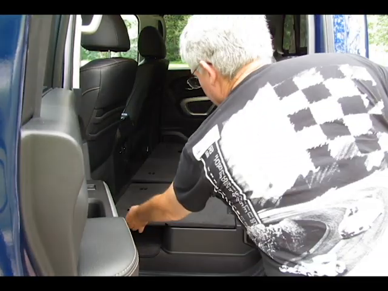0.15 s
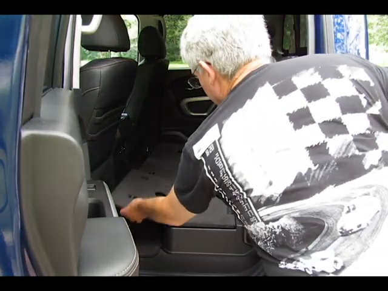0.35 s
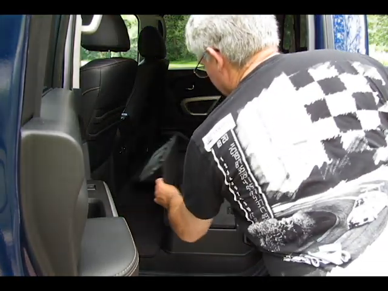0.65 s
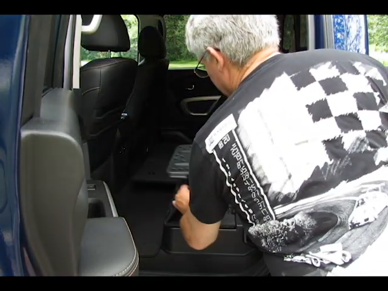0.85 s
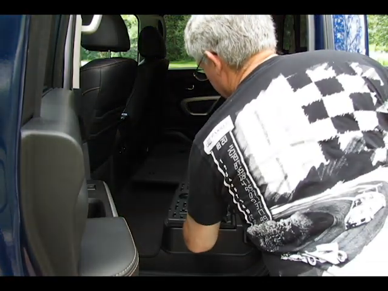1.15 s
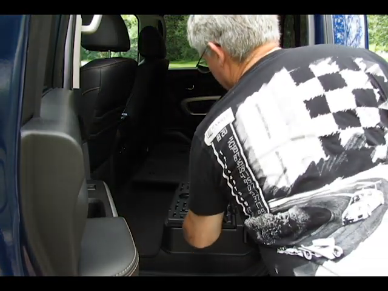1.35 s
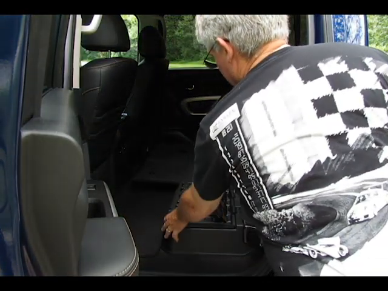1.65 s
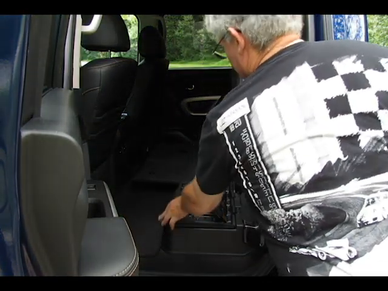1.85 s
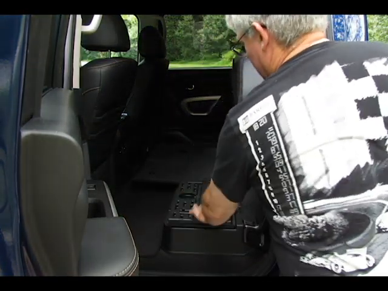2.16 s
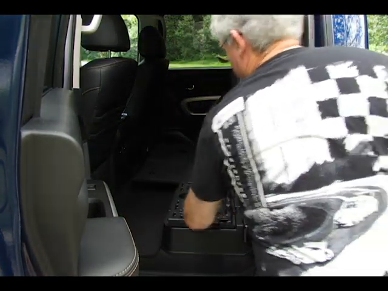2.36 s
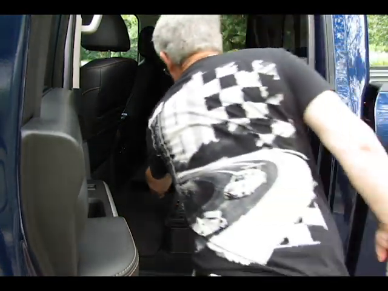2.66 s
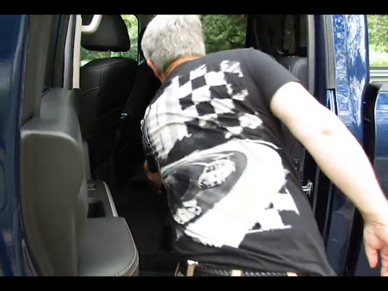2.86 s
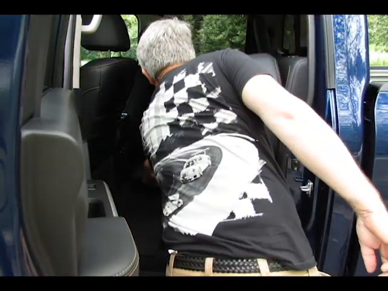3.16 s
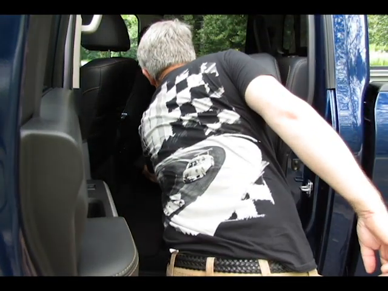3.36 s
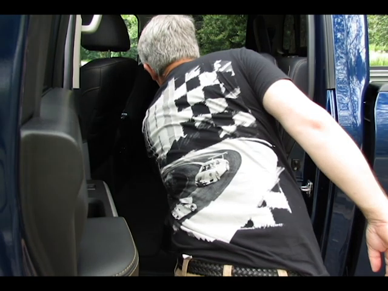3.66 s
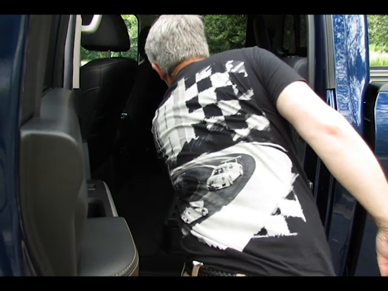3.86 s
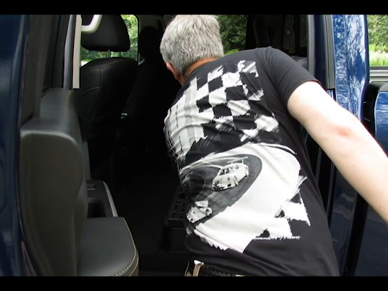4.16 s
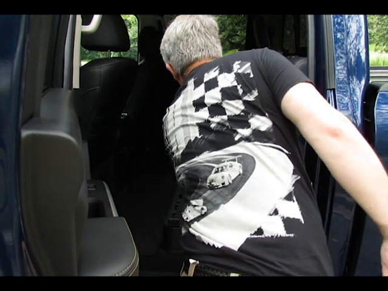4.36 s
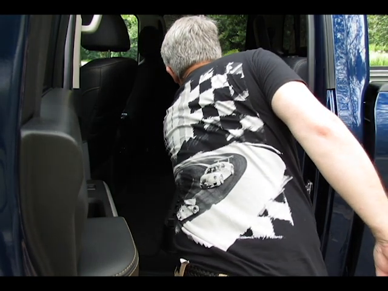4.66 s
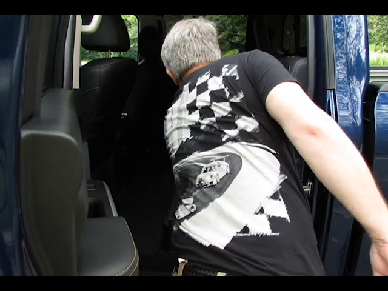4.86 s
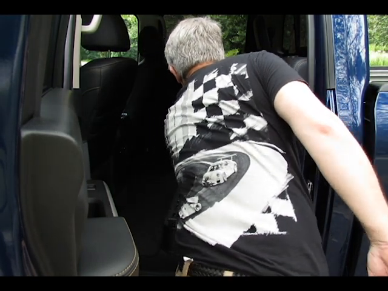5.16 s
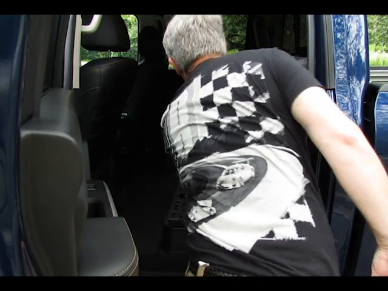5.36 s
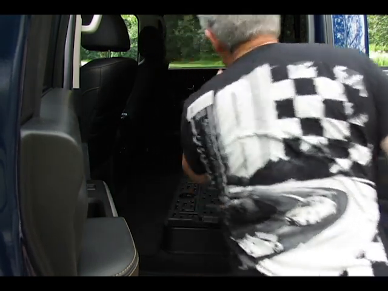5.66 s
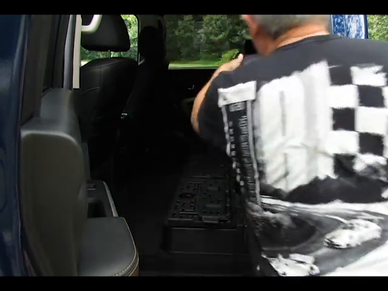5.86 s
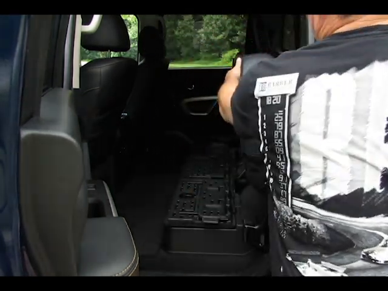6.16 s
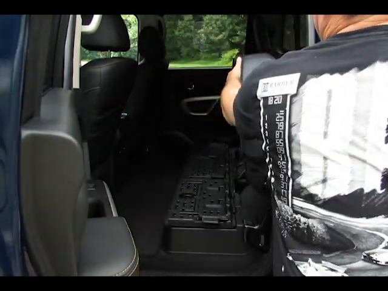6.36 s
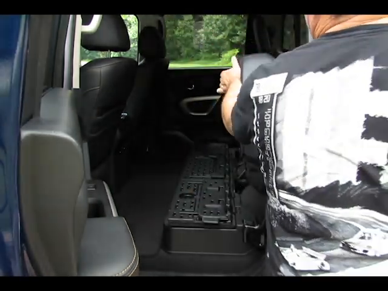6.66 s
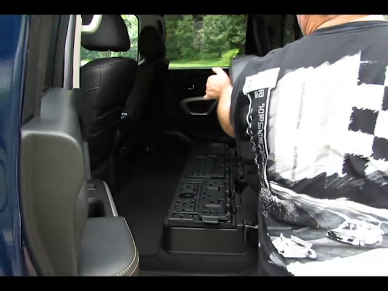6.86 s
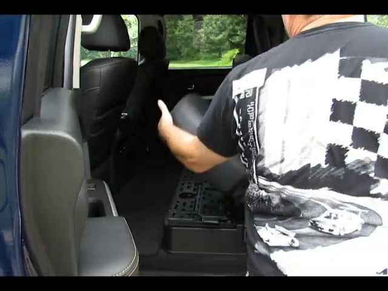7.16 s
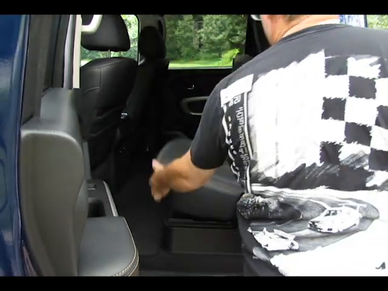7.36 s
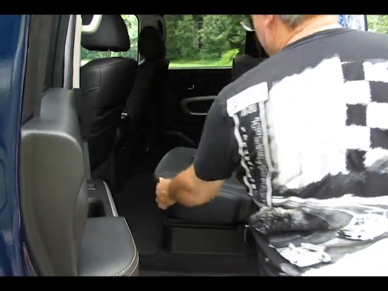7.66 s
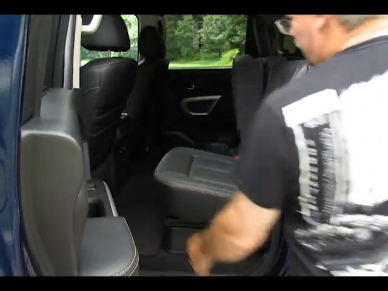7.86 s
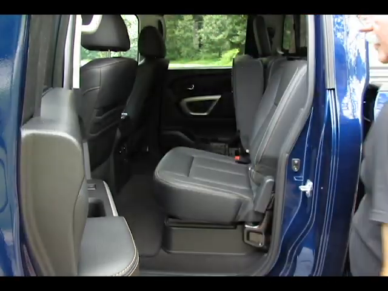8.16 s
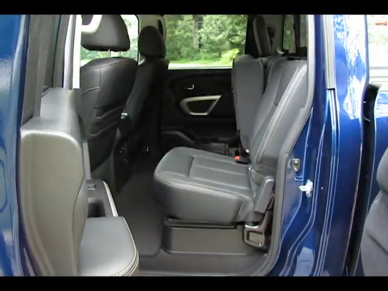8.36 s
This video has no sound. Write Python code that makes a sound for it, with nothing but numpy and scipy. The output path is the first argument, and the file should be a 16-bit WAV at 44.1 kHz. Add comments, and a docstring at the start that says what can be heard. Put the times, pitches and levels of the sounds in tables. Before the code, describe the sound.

Close inside a padded truck cab with the door open, low road rumble and faint insect buzzing. A full plastic thump comes at one second, then small clicks and a duller knock near four. At five a hard clack; at six loud creaky leather snaps with a rub. Then metallic latch clacks tumble together as the seat drops, ending in light creaks and a hand rub.

```python
"""Storage platforms are folded away under the rear seat of a parked truck; the seat is unlatched and dropped.
Plastic panels knock and scrape and the steel latch clacks: rough contacts ring fading tones and a short cab tail.
Leather creaks in small clicks; a sliding panel, a creak and a hand on the seat rub as crowds of tiny slips.
Through the open door come road noise and insects made of coloured noise, and idling engines made of sines.
A gain control turns everything down after hard blows."""
import sys
import numpy as np
from scipy import signal
from scipy.fft import rfft, irfft, next_fast_len
from scipy.io import wavfile
from scipy.ndimage import uniform_filter1d

SR = 44100
rng = np.random.default_rng(int(sys.argv[2]) if len(sys.argv) > 2 else 0)


def generate_wav(signal):
    """Clip the signal to [-1, 1] and save it as 16-bit WAV at the path in sys.argv[1]."""
    frames = np.transpose(np.atleast_2d(signal))
    scaled = np.clip(frames, -1, 1) * 32767
    pcm = np.round(scaled).astype(np.int16)
    wavfile.write(sys.argv[1], SR, pcm)


N = 374618
T = np.arange(N) / SR
HZ = np.fft.rfftfreq(N, 1 / SR)
EDGE_HZ = 15900  # upper edge of the whole sound

# Loudness of the distant road. Each row: time in seconds, change of level in dB.
ROAD = [(0, 4), (.95, 4.5), (1.6, 0.6), (3.5, 0.65), (5.8, -2), (8.49, -0.54)]
# Colour of the outdoor air heard through the cab. Each row: frequency in Hz, relative level in dB.
AIR_COLOUR = [(25, -10.5), (70, 0), (130, 0), (290, -1.5), (400, -8.5), (550, -14), (850, -6.5),
              (1500, -15), (2200, -21.5), (3700, -30.5), (6000, -34.5), (8700, -45.5), (11500, -47.5),
              (15500, -51)]
# The cab rumble grows slowly.
RUMBLE_DB, RUMBLE_DB_PER_S = -3, 0.5

# One engine settles from a fast to a slow idle and fades.
FAST_IDLE_HZ, SLOW_IDLE_HZ, SETTLE_AT_S, SETTLE_S = 71.5, 58.7, 2.28, 0.206
IDLE_DB, IDLE_FADE_DB_PER_S = -40, 1
# Another engine ends slower and louder than it began.
# Each row: time in seconds, engine cycle in Hz, level in dB before the offsets in DRONE.
FAR_IDLE = [(0, 19.5, -48), (3.1, 21.2, -43.5), (4.4, 19.4, -46), (5.9, 18.9, -37), (7.2, 18.42, -36),
            (8.49, 18.1, -38)]
# It drones on odd multiples of its cycle.
# Each row: multiple of the cycle, level offset in dB, extra dB for each dB above DRONE_FULL_DB.
DRONE = [(5, -0.5, 0), (7, -5.5, 1.5), (9, -1, 1.3)]
DRONE_FULL_DB = -36

# Buzzes of an insect in the trees. Each row: start in seconds, level in dB before it swells and flutters.
BUZZES = [(-.4, -58), (.61, -55.5), (1.93, -56), (3.125, -54.5), (4.19, -57), (5.27, -58.5), (6.4, -58.5),
          (7.937, -56)]
BUZZ_S = 0.91  # length of each buzz
# Colours of the buzz and of the chorus. Each row: frequency in Hz, relative level in dB.
BUZZ_COLOUR = [(100, -70), (5000, -24), (6300, -8), (7100, -5.5), (7900, -5), (8400, -22), (10000, -51)]
CHORUS_COLOUR = [(100, -70), (8000, -7), (9200, -3), (9700, 2), (10150, -2), (10700, -16), (14000, -42)]

# Rubs and scrapes: a panel sliding, a creak, a hand on the seat.
# Each row: start in seconds, length in seconds, level in dB before it wavers.
RUBS = [(1.835, .115, -50.5), (4.995, 0.21, -47), (6.028, 0.12, -32.5), (6.732, .11, -44),
        (8.138, 0.17, -32)]
# Colour of the rubbing. Each row: frequency in Hz, relative level in dB.
RUB_COLOUR = [(150, -30), (600, -1), (1200, 2.5), (2000, -2), (3200, 2), (4300, -8.5), (6000, -3.5),
              (9000, -13.5), (12000, -19.5), (16000, -23)]
RUB_ATTACK_S, RUB_RELEASE_S = 0.041, 0.056

# Snaps of leather and trim. Each row: time in seconds, peak level in dB, brightness in dB an octave.
SNAPS = [(5.154, -17, 0.5), (5.226, -20.5, -7), (5.979, -16, -5.5), (6.028, -11, -6), (6.0335, -10.5, 0.5),
         (6.0384, -4, -1), (6.0566, -5, 0), (7.9206, -17.5, 4.5), (7.977, -20.5, -3.5), (7.999, -23, -6),
         (8.034, -20, 0.5), (8.046, -17, 0)]
# Colour of the snaps. Each row: frequency in Hz, relative level in dB.
SNAP_COLOUR = [(100, -36), (600, -11), (1050, -5), (1350, -8), (1650, 4), (2100, 4), (2450, -0.5),
               (2900, -4), (3350, -7), (4300, -12), (5700, -7.5), (7500, -20), (10000, -34), (16000, -26.5)]
# The gripped cushion creaks on in a dying run of small snaps; brightness is in dB an octave.
CREAK_AT_S, CREAK_GAP_S, CREAK_DB, CREAK_FADE_DB_PER_S, CREAK_BRIGHT_DB = 6.063, 0.011, -17, 60, 1.2

# Blows and a short scrape of the plastic platforms.
# Each row: time in seconds, length of the contact's chatter in seconds,
# time in seconds for the cab tail to fade by 60 dB, pitch region favoured by the struck spot in Hz,
# strength in dB, weight of the bass in dB, brightness in dB an octave.
PLATFORM_CONTACTS = [(1.0543, 0.0039, 0.082, 297, -15, 11, -5.4),
                     (1.065, 0.0047, 0.042, 1800, -30, 12, 1.3), (1.884, 0.0036, .087, 2270, -39, -27, -4),
                     (2.2195, 0.007, 0.035, 2350, -33.5, -10, -8.5),
                     (2.2235, 0.0036, .02, 824, -28.5, 0, -4.5),
                     (2.2325, .0025, 0.092, 175, -36.5, 11.5, -4.5),
                     (3.245, 0.0077, .081, 298, -40, -7, -7), (3.761, 0.0033, .05, 685, -43.5, 6, -9),
                     (3.9285, 0.012, 0.022, 670, -24.5, 5.5, -1.1),
                     (3.941, 0.015, 0.21, 70, -27.5, 14.5, -3.5), (4.046, .008, .11, 635, -41.5, 4, -4.5),
                     (4.966, .01, .061, 2430, -39, 3, -1), (5.019, 0.02, 0.14, 220, -40.5, 13, -9),
                     (5.049, 0.021, 0.12, 720, -41, 19.5, -6), (5.077, .0054, 0.039, 2790, -31.5, 3, 1),
                     (5.0805, 0.0041, 0.064, 627, -11, -3.5, -3.5)]
# Blows of the seat latch and frame. The columns are those of the platform contacts.
SEAT_BLOWS = [(6.392, .012, .094, 2390, -39.5, -11, -1), (6.41, 0.0043, 0.094, 2480, -24, -3.5, -4.5),
              (6.7185, 0.0032, 0.079, 1250, -17, -10.5, -5), (7.118, .016, 0.28, 2610, -28.5, -10, 1.5),
              (7.133, 0.01, 0.11, 1280, -25.5, -13.5, -2.5), (7.1415, .009, 0.054, 2580, -17.5, -19, 0.15),
              (7.167, 0.026, .075, 1940, -32, -14, 0), (7.415, 0.0068, 0.055, 240, -30, 3.5, -3.6),
              (7.424, 0.0018, .17, 70, -25, 1.5, -3.2), (7.4545, 0.012, 0.21, 2220, -25, 3.5, -1),
              (7.522, 0.014, .1, 244, -40, 12, -3), (7.542, 0.024, 0.36, 70, -42.5, 13.5, -4),
              (7.613, 0.022, .6, 325, -42, 4, -5.3)]
# Ringing tones (modes) of the platforms and of the seat, before each contact varies them.
# Each row: frequency in Hz, relative level in dB, time in seconds to fade by 60 dB.
PLATFORM_MODES = [(56.9, -24, 1), (90, -12.5, 0.13), (199.3, -2, 0.13), (230, 4.5, 0.053),
                  (307.5, -1, 0.052), (381, -4, 0.1), (515, -12.5, 0.076), (626, -7.5, 0.079),
                  (920, 4.5, 0.022), (1130, -48, 0.11), (1250, -9, 0.035), (1700, 9, 0.02),
                  (1760, -2, 0.062), (2270, -7, 0.03), (2680, -5, 0.068), (2870, 11, 0.051),
                  (3970, 6, 0.036), (5590, 19, 0.017), (6640, 4, .02), (9600, -21, .03)]
SEAT_MODES = [(33.7, 1, 0.33), (45, -18, 0.25), (67, 11, 0.17), (149, 2, 0.16), (238, 1.5, 0.15),
              (292, -6, 0.19), (368, -3.5, 0.12), (527, -20, .07), (830, -10, 0.077), (1140, -24, 0.063),
              (1444, -8, 0.17), (1680, -22, 0.056), (2050, -23, 0.072), (2170, -7, 0.025),
              (2440, -8, 0.063), (2640, -6, 0.064), (3320, -1, 0.064), (4170, -28, 0.096), (5905, 7, 0.095),
              (6600, 4, 0.094), (9750, 6, 0.1)]
# Plastic and padding shape every contact. Each row: frequency in Hz, relative level in dB.
SOFTNESS = [(20, -15), (35, 0.5), (95, 0), (135, -1.5), (190, -5), (7000, 9), (10500, -4), (13000, -11),
            (16000, -14)]
# Centres of the six ranges of a contact in Hz: thud, boom, knock, clack, tick, fizz.
RANGES_HZ = [60, 230, 700, 2000, 5200, 11500]
# How much of a contact's weight each of the six ranges takes, from 0 to 1.
WEIGHT_SHARE = [1, 1, 0.25, 0.0054, 0.02, 0.013]
# Balance of a plain contact over the six ranges, in dB.
PLATFORM_BALANCE = [-11, 0, -0.5, 0, -1, 1.5]
SEAT_BALANCE = [0.5, 0.5, -2, 0, -.5, 1]
# Brightness tilts the spectrum above this frequency; the struck spot reaches this many octaves.
BRIGHT_FROM_HZ, SPOT_OCTAVES = 1890, 0.95

# Side over mid, outdoors and in the cab. Each row: frequency in Hz, change of the side in dB.
OUTDOOR_WIDTH = [(30, -1), (70, -5.5), (250, -13), (500, -6), (1000, -4), (2000, -1), (4000, 0),
                 (14000, 0.5)]
CAB_WIDTH = [(30, 0), (70, -11), (250, -19), (500, -17), (1000, -16), (2000, -10), (4000, -5), (8000, -8),
             (14000, 0.5)]
# Lean of the whole scene. Each row: frequency in Hz, left over right in dB.
LEAN = [(30, -8), (100, 3.5), (250, 3), (1000, 0), (2000, -2.1), (8000, -0.1), (14000, 1)]


def amp(db):
    """Turns decibels into gain."""
    return 10 ** (np.asarray(db) / 20)


def evened(x):
    """Scales x to an rms of 1."""
    return x / np.sqrt(np.mean(x ** 2) + 1e-20)


def read(points, hz):
    """Reads a spectrum in dB, joined by straight lines on a log-frequency axis."""
    point_hz, db = np.transpose(points)
    return np.interp(np.log(hz + 1), np.log(point_hz + 1), db)


def curves(rows):
    """Draws each column of a timed table sample by sample."""
    s, *columns = np.transpose(rows)
    return [np.interp(T, s, column) for column in columns]


def add(mix, s, sound):
    """Mixes a two-channel sound in at s seconds."""
    part = mix[:, round(s * SR):][:, :sound.shape[1]]
    part += sound[:, :part.shape[1]]


def causal(db):
    """Minimum-phase response of a gain curve: its sound comes at and after the blow, not ahead of it."""
    mirrored = np.concatenate([db, db[-2:0:-1]])
    log_gain = np.log(amp(mirrored))
    return np.exp(np.conj(signal.hilbert(log_gain)))[:len(db)]


def coloured(x, colour):
    """Gives x a spectrum, at an rms of 1."""
    size = next_fast_len(N)
    gain = amp(read(colour, np.fft.rfftfreq(size, 1 / SR)))
    return evened(irfft(rfft(x, size) * gain, size)[..., :N])


def drift(rate):
    """Random wandering of rms 1, with a new random value rate times a second."""
    return evened(np.interp(T * rate, np.arange(4000), rng.standard_normal(4000)))


def outdoors(level_db=-35, waver_db=0.7):
    """Road noise and cab rumble change level separately; the thin hiss above stays level."""
    air = amp(level_db) * coloured(rng.standard_normal((2, N)), AIR_COLOUR)
    low = signal.sosfiltfilt(signal.butter(2, 210, fs=SR, output="sos"), air)
    below_hiss = signal.sosfiltfilt(signal.butter(2, 7000, fs=SR, output="sos"), air)
    road_db = curves(ROAD)[0]
    rumble_db = RUMBLE_DB + RUMBLE_DB_PER_S * T + waver_db * drift(8.1)
    rumble = low * amp(rumble_db)
    road = (below_hiss - low) * amp(road_db)
    hiss = air - below_hiss
    return rumble + road + hiss


def engines(second_db=-8, waver_db=1.33, wobble=0.0034):
    """Two idling engines, heard as a few low harmonics whose pitch and level waver."""
    settled = (1 + np.tanh((T - SETTLE_AT_S) / SETTLE_S)) / 2
    near_hz = FAST_IDLE_HZ + (SLOW_IDLE_HZ - FAST_IDLE_HZ) * settled
    near_db = IDLE_DB - IDLE_FADE_DB_PER_S * T
    near_angle = 2 * np.pi * np.cumsum(near_hz * (1 + wobble * drift(6))) / SR
    far_hz, far_db = curves(FAR_IDLE)
    far_angle = 2 * np.pi * np.cumsum(far_hz * (1 + wobble * drift(6))) / SR
    harmonics = [(near_angle, near_db), (2 * near_angle, near_db + second_db)]
    for multiple, own_db, extra in DRONE:
        level_db = far_db + own_db + extra * (far_db - DRONE_FULL_DB)
        harmonics.append((round(multiple) * far_angle, level_db))
    # the root of two makes each level an rms level
    return np.sqrt(2) * sum(amp(db + waver_db * drift(8.4)) * np.sin(angle) for angle, db in harmonics)


def insects(chorus_db=-63, rise_s=0.025, fade_s=0.64):
    """One insect buzzes about once a second, swelling and fading, over a steady, higher chorus."""
    song = np.zeros(N)
    for s, db in BUZZES:
        rise = np.clip((T - s) / rise_s, 0, 1) ** 0.5
        fade = np.clip((s + BUZZ_S - T) / fade_s, 0, 1)
        song += amp(db) * rise * fade
    flutter = amp(drift(220))
    buzz = song * flutter * coloured(rng.standard_normal((2, N)), BUZZ_COLOUR)
    chorus = amp(chorus_db) * coloured(rng.standard_normal((2, N)), CHORUS_COLOUR)
    return buzz + chorus


def rubs(slips_per_s=450, hiss_db=-20):
    """Crowds of tiny slips between rubbing surfaces, which catch and let go in clumps."""
    slips = (rng.random(N) < slips_per_s / SR) * rng.standard_normal((2, N))
    strokes = np.zeros(N)
    for s, length, db in RUBS:
        attack = (T - s) / RUB_ATTACK_S
        release = (s + length - T) / RUB_RELEASE_S
        strokes += amp(db) * np.clip(np.minimum(attack, release), 0, 1)
    pressure = strokes * amp(2 * drift(110))
    hiss = amp(hiss_db) * rng.standard_normal((2, N))
    return pressure * coloured(slips + hiss, RUB_COLOUR)


def creak(count=6, uneven=0.25, scatter_db=-2.0):
    """A run of snaps at uneven gaps, tending to weaken; returns rows like those of SNAPS."""
    jitter, size = rng.standard_normal((count, 2)).T
    after_s = CREAK_GAP_S * (np.arange(count) + uneven * jitter)
    peak_db = CREAK_DB - CREAK_FADE_DB_PER_S * after_s + scatter_db * size
    return [(CREAK_AT_S + s, db, CREAK_BRIGHT_DB) for s, db in zip(after_s, peak_db)]


def snaps(tail_db=-25, tail_t60=0.08):
    """Leather sticks and lets go: single clicks with a brief tail from the cab."""
    out = np.zeros((2, N))
    t = np.arange(2 ** 12) / SR
    hz = np.fft.rfftfreq(len(t), 1 / SR)
    for s, db, bright in [*SNAPS, *creak()]:
        click = amp(tail_db) * rng.standard_normal((2, len(t))) * amp(-60 * t / tail_t60)
        click[0, 0] += 1
        colour_db = read(SNAP_COLOUR, hz) + bright * np.log2((hz + 100) / 2500)
        click = irfft(rfft(click) * causal(colour_db))
        add(out, s, amp(db) * click / abs(click[0]).max())
    return out


def bending(hz, lag_s=0.000593):
    """In a panel the treble travels faster than the bass, which smears each contact a little."""
    return np.exp(-2j * np.pi * lag_s * np.sqrt(hz * EDGE_HZ))


def range_levels(balance, spot_hz, strength_db, weight_db, bright_db, favour_db=6):
    """Weight swells the bass of a contact, hardness its treble, and the struck spot its own region."""
    hz = np.array(RANGES_HZ)
    tilt = bright_db * np.maximum(np.log2(hz / BRIGHT_FROM_HZ), 0)
    favoured = favour_db * np.exp(-(np.log2(hz / spot_hz) / SPOT_OCTAVES) ** 2)
    return strength_db + np.array(balance) + weight_db * np.array(WEIGHT_SHARE) + tilt + favoured


def rough_contact(t, chatter_s, snap_s, chatter_hz):
    """A sharp first touch and its chatter: the longer the chatter, the less the touch stands out."""
    chatter = rng.standard_normal((2, len(t))) * rng.exponential(1, (2, len(t)))
    chatter *= np.exp(-(t / chatter_s) ** 2)
    # keep the chatter out of the bass, which the first touch drives
    chatter = signal.lfilter(*signal.butter(1, chatter_hz, "high", fs=SR), chatter)
    contact = chatter_s / snap_s * chatter / np.linalg.norm(chatter, axis=1, keepdims=True)
    contact[0, 0] += 1
    return contact


def ringing(t, modes, stray):
    """Fading sines of the struck part; each contact varies their levels and pitches by chance."""
    mode_hz, mode_db, mode_t60 = np.transpose(modes)[:, :, None]
    level = amp(mode_db + rng.standard_normal(mode_hz.shape))
    pitch = mode_hz * (1 + stray * rng.standard_normal(mode_hz.shape))
    ring = (level * amp(-60 * t / mode_t60) * np.sin(2 * np.pi * pitch * t)).sum(0)
    return ring / np.linalg.norm(ring)


def cab_tail(t, t60, first_db, cabin_db, cabin_rise, treble_hz):
    """Direct sound and a dense tail; upholstery swallows the treble no later than the bass."""
    echoes = rng.standard_normal((2, len(t))) * (1 - np.exp(-t / cabin_rise))
    low = signal.lfilter(*signal.butter(1, treble_hz, fs=SR), echoes)
    tail = low * amp(-60 * t / t60) + (echoes - low) * amp(-60 * t / min(t60, 0.08))
    air = amp(cabin_db) * tail / np.linalg.norm(tail, axis=1, keepdims=True)
    air[:, 0] += amp(first_db)
    return air


def contacts(rows, modes, balance, first_db, cabin_db, cabin_rise, snap_s, stray, treble_hz, spot_db, chatter_hz):
    """Each rough contact rings the modes and the padded cab, in mid and side."""
    out = np.zeros((2, N))
    t = np.arange(2 ** 14) / SR
    hz, centres = np.fft.rfftfreq(len(t), 1 / SR), np.array(RANGES_HZ)
    band = np.searchsorted(np.sqrt(centres[1:] * centres[:-1]), hz)
    soft = causal(read(SOFTNESS, hz)) * bending(hz)
    fade_out = np.minimum(1, 2 * (1 - t / t[-1]))
    for s, chatter_s, t60, spot_hz, *force in rows:
        levels_db = range_levels(balance, spot_hz, *force)
        contact = rough_contact(t, chatter_s, snap_s, chatter_hz)
        ring = ringing(t, modes, stray)
        air = cab_tail(t, t60, first_db, cabin_db, cabin_rise, treble_hz)
        spectrum = soft * rfft(contact) * (rfft(ring) + rfft(air))
        spectrum *= causal(spot_db * np.exp(-(np.log2((hz + 1) / spot_hz) / 0.36) ** 2))
        # pull each range towards its level; a second pass comes closer, as neighbouring ranges interact
        for _ in range(2):
            for k in range(2):
                energy = np.bincount(band, abs(spectrum[k]) ** 2 * (hz < EDGE_HZ)) * 2 / len(t)
                power = energy / (0.02 * SR)  # as if spread over 20 ms
                change_db = levels_db - 10 * np.log10(power)
                spectrum[k] *= causal(read(list(zip(centres, change_db)), hz))
        add(out, s, irfft(spectrum) * fade_out)
    return out


def platform_contacts():
    """Plastic panels knock and briefly scrape, exciting the platform modes and the cab."""
    return contacts(PLATFORM_CONTACTS, PLATFORM_MODES, PLATFORM_BALANCE, first_db=6, cabin_db=2.5,
                    cabin_rise=0.00065, snap_s=0.002, stray=0.0092, treble_hz=1200, spot_db=8, chatter_hz=564)


def seat_blows():
    """The steel latch and seat frame clack, exciting the seat modes and the cab."""
    return contacts(SEAT_BLOWS, SEAT_MODES, SEAT_BALANCE, first_db=4, cabin_db=1.5,
                    cabin_rise=0.0011, snap_s=0.0025, stray=0.0138, treble_hz=2540, spot_db=2, chatter_hz=201)


def scene():
    """Adds all sources as mid and side, then spreads them to left and right."""
    cab = platform_contacts() + seat_blows() + snaps() + rubs()
    outside = outdoors() + insects()
    mid = rfft(cab[0] + outside[0] + engines())
    cab_side = rfft(cab[1]) * amp(read(CAB_WIDTH, HZ))
    outside_side = rfft(outside[1]) * amp(read(OUTDOOR_WIDTH, HZ))
    side = cab_side + outside_side
    lean = amp(read(LEAN, HZ) / 2)
    return irfft(np.array([(mid + side) * lean, (mid - side) / lean]), N)


def record(dry, threshold_db=-9, slope=1.0, most_db=11, recovery_db=16):
    """Hard blows pull the gain down; it creeps back by recovery_db a second, and peaks over 1 clip."""
    power_db = 10 * np.log10(abs(uniform_filter1d((dry ** 2).mean(0), size=176)) + 1e-12)  # over 4 ms
    wanted_db = np.clip(slope * (power_db - threshold_db), 0, most_db)
    # hold the deepest duck so far, let go at a steady rate
    creep = T * recovery_db
    duck_db = np.maximum.accumulate(wanted_db + creep) - creep
    lag = np.exp(-1 / (0.0012 * SR))  # the gain follows within about 1.2 ms
    smooth_db = signal.lfilter([1 - lag], [1, -lag], duck_db)
    ducked = np.clip(dry / amp(smooth_db), -1, 1)
    lowpass = signal.firwin(511, EDGE_HZ, window=("kaiser", 8), fs=SR)
    return signal.oaconvolve(ducked, lowpass[None], "same")


dry = scene()
out = record(dry)
generate_wav(out)
```